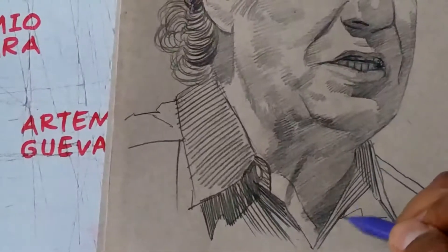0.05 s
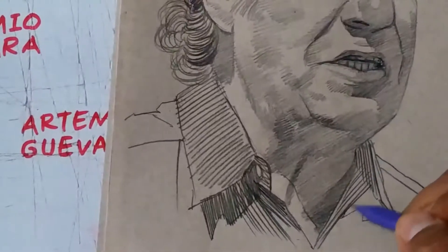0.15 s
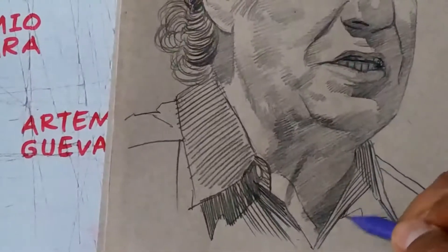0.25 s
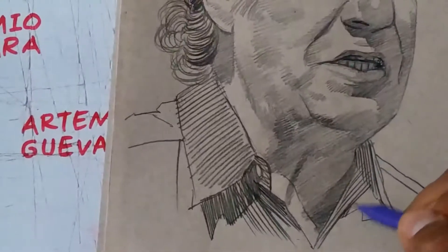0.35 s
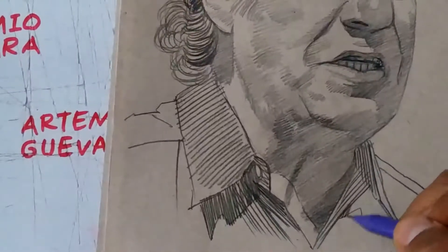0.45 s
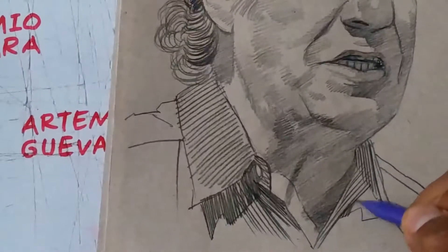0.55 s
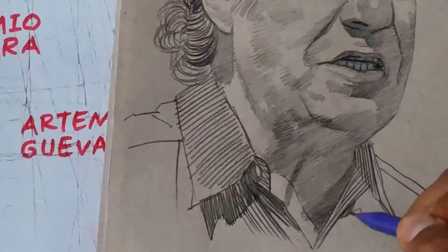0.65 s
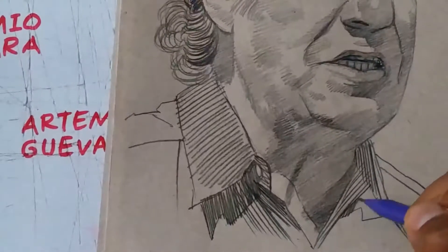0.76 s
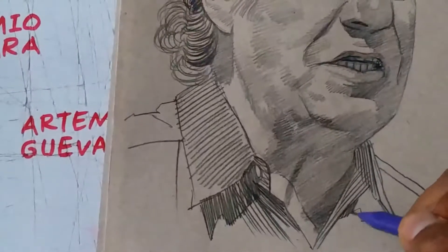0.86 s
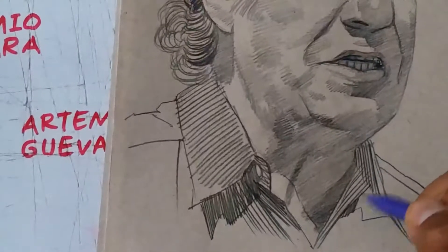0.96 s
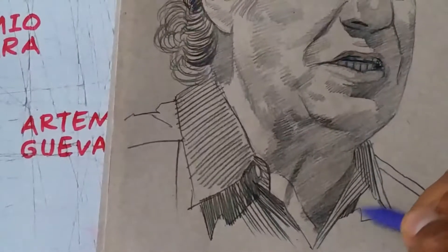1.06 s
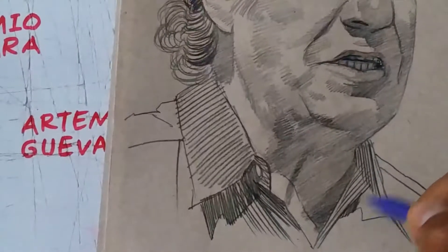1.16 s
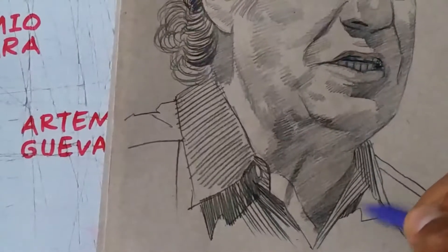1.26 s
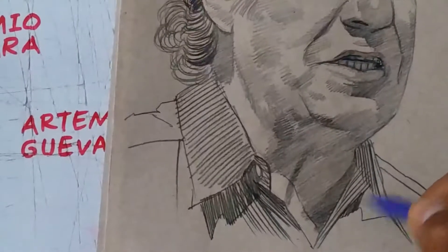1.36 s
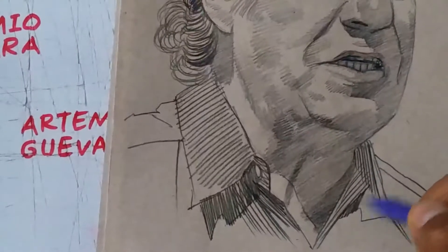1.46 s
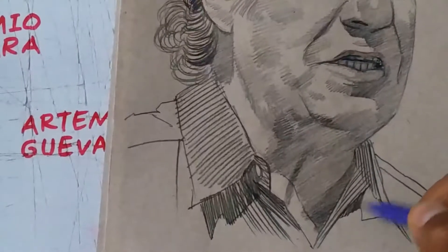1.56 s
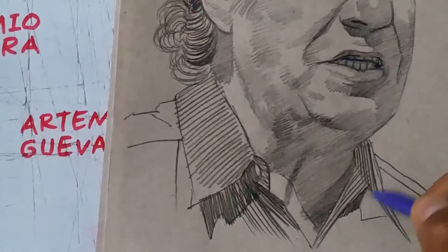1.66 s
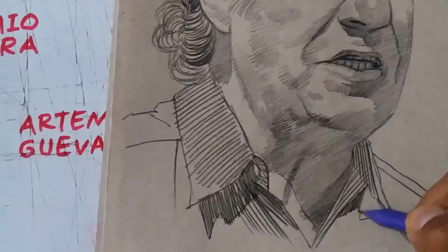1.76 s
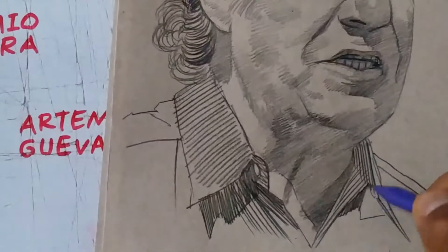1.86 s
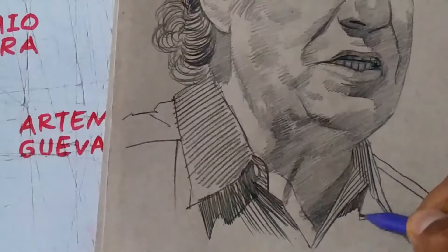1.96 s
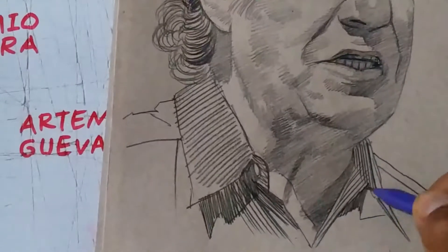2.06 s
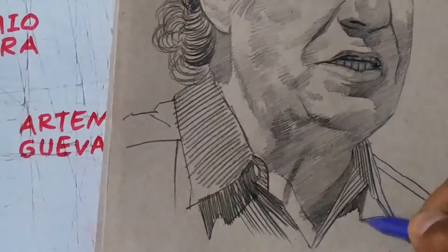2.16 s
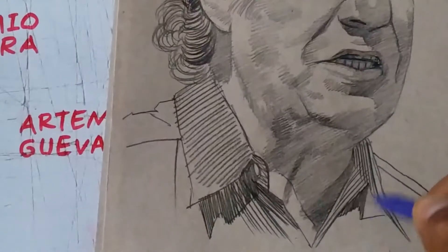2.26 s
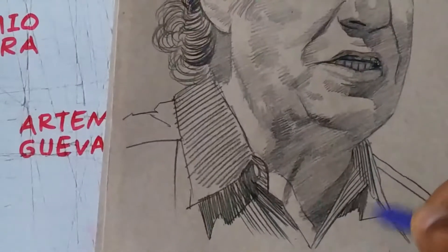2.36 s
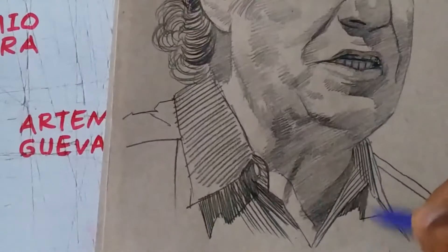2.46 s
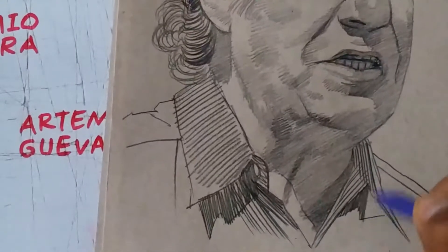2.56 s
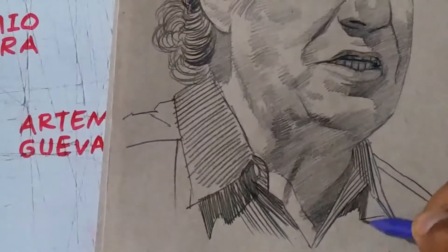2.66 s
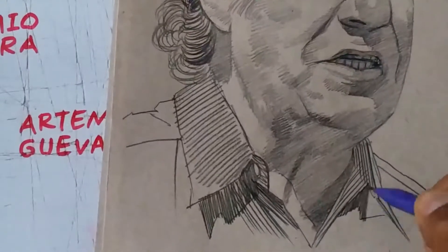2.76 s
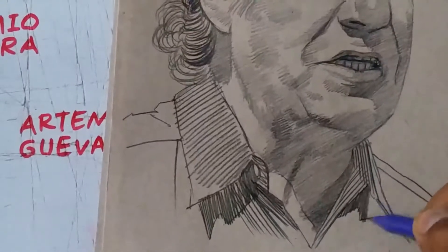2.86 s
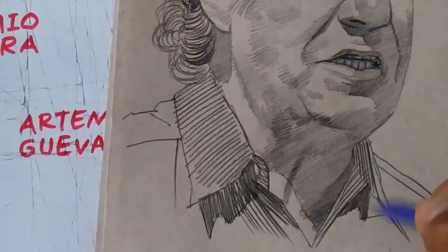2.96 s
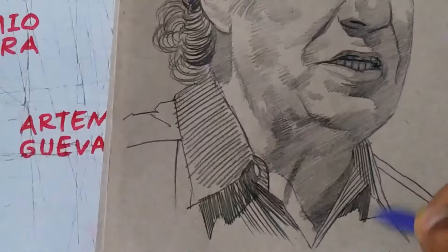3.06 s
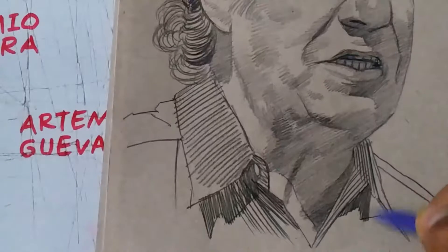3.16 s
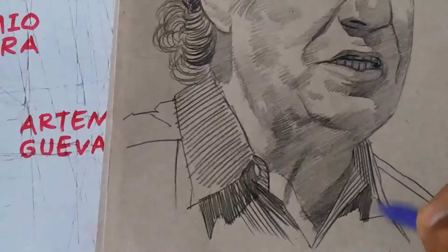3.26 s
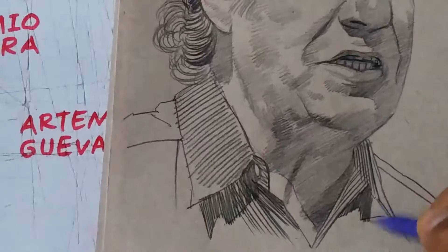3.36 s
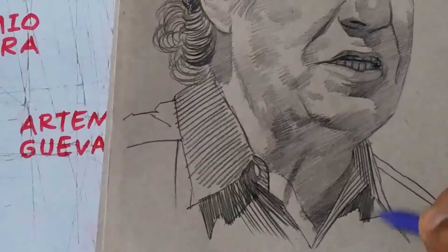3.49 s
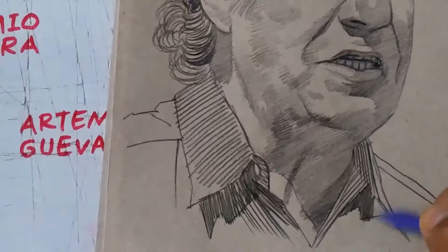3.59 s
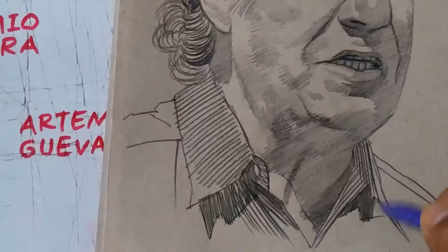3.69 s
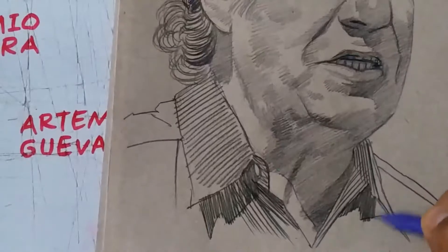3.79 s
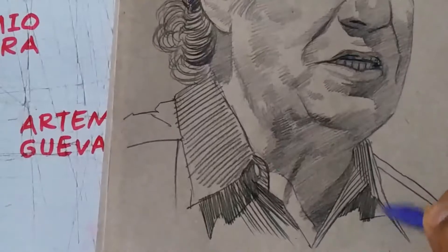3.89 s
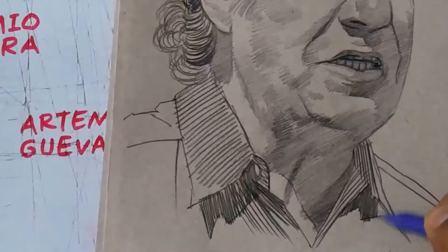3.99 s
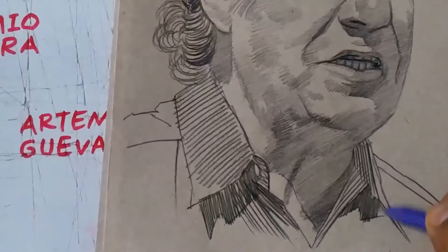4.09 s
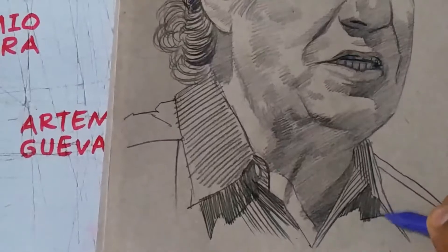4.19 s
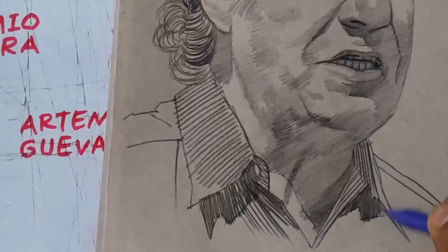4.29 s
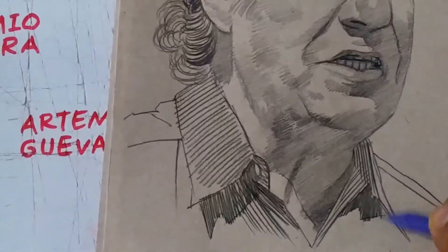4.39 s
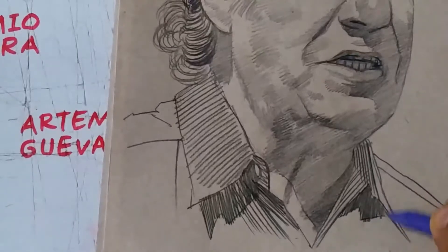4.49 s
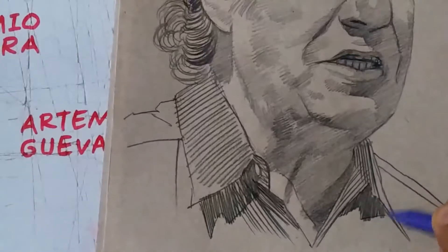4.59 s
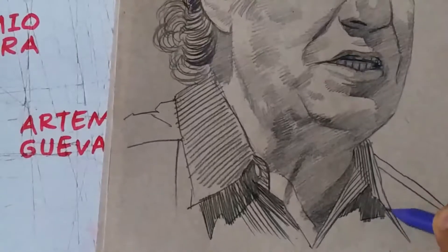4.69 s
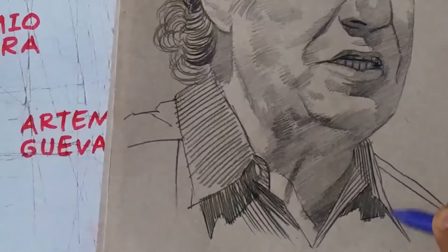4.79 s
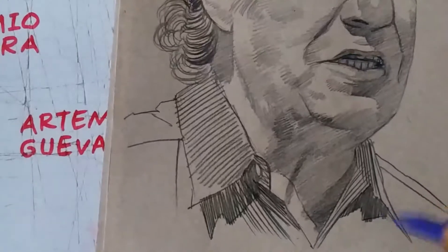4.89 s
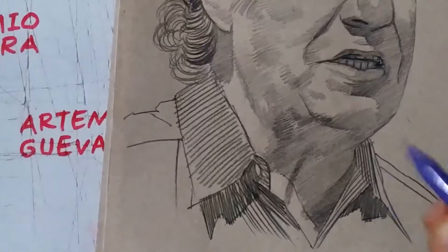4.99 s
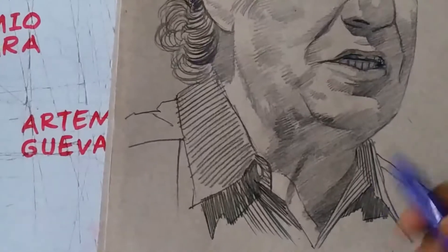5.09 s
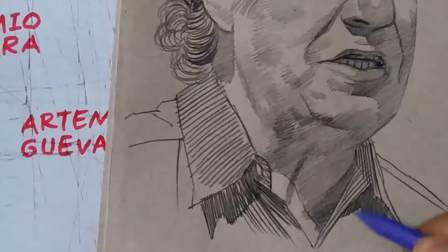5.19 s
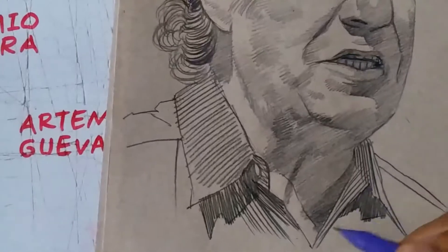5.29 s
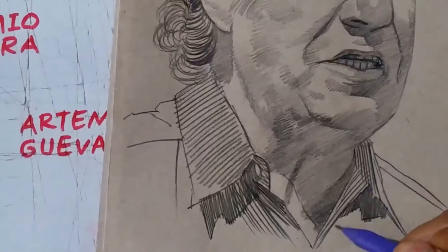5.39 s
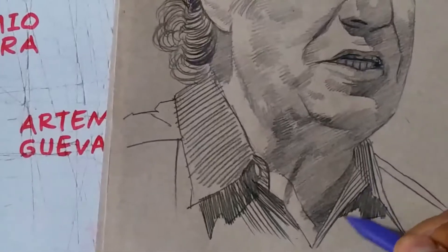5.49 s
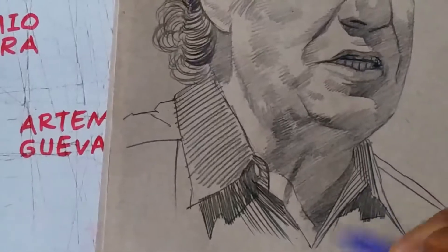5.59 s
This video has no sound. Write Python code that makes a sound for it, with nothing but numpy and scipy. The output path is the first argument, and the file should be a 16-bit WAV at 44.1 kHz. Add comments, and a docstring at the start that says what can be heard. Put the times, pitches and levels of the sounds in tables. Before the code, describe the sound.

Dry, grainy back-and-forth pencil strokes run steadily, papery at first and then a little woodier, with low thuds from the board beneath. They lighten and stop; the pencil slides squeakily through the fingers and clicks. Three separate, weightier scratches end it. Close microphone, small quiet room, short faint reverberation, low rumble and hiss.

```python
"""Pencil hatching on paper

A pencil hatches back and forth on a sheet of paper lying on a board, close to the microphone in a quiet room.
The paper's grain jolts the lead: random jolts excite resonances, so the pencil rings, the sheet rasps and
the board thuds. In a pause the pencil slides through the fingers (rubbing noise through the barrel's
resonances) and clicks (decaying sines); then three firmer strokes follow on another part of the sheet."""
import sys
import numpy as np
from scipy import signal
from scipy.fft import rfft, irfft
from scipy.io import wavfile
from scipy.ndimage import map_coordinates

SR = 44100
rng = np.random.default_rng(int(sys.argv[2]) if len(sys.argv) > 2 else 0)


def output_pcm(signal):
    """Save a mono or channel-first signal as 16-bit PCM at the path in sys.argv[1].

    Samples are clipped to [-1, 1] before scaling.
    """
    pcm = np.clip(np.atleast_2d(signal).T, -1, 1) * 32767
    wavfile.write(sys.argv[1], SR, np.round(pcm).astype(np.int16))


N = 248724
TAPS = 8192  # length of the frequency responses in samples
BINS = np.fft.rfftfreq(TAPS, 1 / SR)  # their frequencies in Hz


def gain_of(db):
    """The decibel: twenty times the logarithm of an amplitude ratio, inverted here."""
    return 10 ** (np.asarray(db) / 20)


def evened(x):
    """Root-mean-square level: scales a signal to rms 1."""
    return x / np.sqrt(np.mean(x ** 2) + 1e-20)


def unit(gain):
    """Power through a filter: scales a response to pass white noise at equal power."""
    return gain / np.sqrt(np.mean(gain ** 2))


def at(curve, s):
    """Linear interpolation: reads a curve at time s."""
    return np.interp(s, *np.transpose(curve))


def read(points, hz):
    """Logarithmic pitch scale: interpolates a table along log frequency."""
    f, value = np.transpose(points)
    return np.interp(np.log(hz + 1), np.log(f), value)


def add(mix, s, sound):
    """Superposition: adds a sound into the mix at time s."""
    part = mix[max(round(s * SR), 0):][:len(sound)]
    part += sound[:len(part)]


def humps(modes, shift=1):
    """Resonance: steep-sided peaks in gain, their powers summed."""
    power = 0
    for hz, width, db in modes:
        offset = (BINS - hz * shift) / (width / np.sqrt(2))
        power = power + (gain_of(db) / (1 + offset ** 2)) ** 2
    return np.sqrt(power)


def above(hz):
    """Band splitting: a soft step from 0 to 1 around a frequency."""
    return 1 / (1 + (hz / (BINS + 1)) ** 40)


def ring(gain):
    """Minimum phase: the causal impulse response whose gain over frequency is given."""
    log_gain = np.log(np.maximum(gain / gain.max(), 1e-5))
    circle = np.concatenate([log_gain, log_gain[-2:0:-1]])
    spectrum = np.exp(np.conj(signal.hilbert(circle)))[:len(BINS)]
    return gain.max() * irfft(spectrum)[:TAPS // 2]


def wander(count, hz):
    """Slow random modulation of rms 1: straight lines between hz random values a second."""
    knots = rng.standard_normal(4096)
    return evened(np.interp(np.arange(count) * hz / SR, np.arange(len(knots)), knots))


def fibres(speed, density, spread_db, clump_db, clump_hz):
    """Roughness excitation: random jolts, more of them at speed, uneven in size, in clumps."""
    count = len(speed)
    hit = rng.random(count) < density * (.3 + speed) / SR  # density * (0.3 + speed) jolts a second
    size = gain_of(spread_db * np.minimum(rng.exponential(1, count), 4))
    size = size * rng.choice([-1, 1], count)
    return hit * size * gain_of(clump_db * wander(count, clump_hz))


def driven(jolts, force, gain):
    """Forced vibration: jolts under a force curve ring a body; force and gain set the energy."""
    sound = signal.fftconvolve(jolts * force, ring(gain))
    energy = np.sum(force ** 2) * np.mean(gain ** 2)
    return sound * np.sqrt(energy / (np.sum(sound ** 2) + 1e-20))


def blows(rows, gain, contact_s):
    """Impact excitation: decaying noise bursts ring a body; each row gives start_s, peak_db."""
    out, t, body = np.zeros(N), np.arange(TAPS // 8) / SR, ring(gain)
    for s, db in rows:
        burst = rng.standard_normal(len(t)) * np.exp(-t / contact_s)
        sound = signal.fftconvolve(burst, body)
        add(out, s, gain_of(db) * sound / abs(sound).max())
    return out


def ripple(shortest_s, longest_s, strength, most=.6):
    """Random spectral ripple: two randomly drawn combs give each stroke its own uneven colour."""
    colour = 1
    for spacing_s in rng.uniform(shortest_s, longest_s, 2):  # the ripple repeats every 1 / spacing_s Hz
        turn = np.exp(2j * np.pi * (BINS * spacing_s + rng.random()))
        colour = colour * abs(1 + np.clip(strength, 0, most) * turn)
    return colour


def sliding(sound, count, glide):
    """Pitch glide by resampling: the resonances slide while the tip travels for count samples."""
    pace = 1 + glide * np.interp(np.arange(len(sound)), [0, count], [-1, 1])
    return map_coordinates(sound, [np.cumsum(pace)], order=5)


# spectrum of the room noise: pitch_hz [Hz], relative density_db [dB per Hz]
NOISE_SPECTRUM = [(20, -39), (55, 9), (120, -6.5), (250, -13.5), (500, -24), (1000, -25.5), (3000, -30.5),
                  (6000, -30), (15500, -37)]
NOISE_DB = -45  # rms level before the rumble sways


def floor(sway_db=2):
    """Coloured noise: low room rumble that sways, under a steady faint hiss."""
    hz = np.fft.rfftfreq(N, 1 / SR)
    spectrum = rfft(rng.standard_normal(N)) * gain_of(read(NOISE_SPECTRUM, hz))
    noise = evened(irfft(spectrum, N))
    rumble = signal.sosfilt(signal.butter(2, 200, fs=SR, output="sos"), noise)
    sway = gain_of(sway_db * wander(N, 13)) - 1
    return gain_of(NOISE_DB) * (noise + rumble * sway)


# reverberation of the room: pitch_hz [Hz], t60_s [s]
ROOM_DECAY = [(100, 0.3), (400, 0.33), (1500, 0.32), (5000, 0.34), (13000, 0.26)]


def room(x, gap_s=0.0046):
    """Reverberation: dense reflections, each band dying at its own speed."""
    count = SR // 2
    late = np.arange(count) > gap_s * SR
    taps = rng.standard_normal(count) * (rng.random(count) < 4000 / SR) * late
    hz, t, z = signal.stft(taps, SR, nperseg=256)
    decay = gain_of(-60 * t / read(ROOM_DECAY, hz)[:, None])
    tail = signal.istft(z * decay, SR, nperseg=256)[1]
    return signal.fftconvolve(x, tail / np.linalg.norm(tail))[:N]


# the pencil clicks in the hand: start_s [s], peak_db [dB]
PENCIL_CLICKS = [(4.781, -9)]
# what a click rings with: pitch_hz [Hz], relative level_db [dB], t60_s [s]
CLICK_PARTIALS = [(2160, -29.5, 0.064), (4580, 1.5, 0.008), (5400, 0.5, 0.0096), (6750, -4, 0.016),
                  (11600, -22.5, 0.018)]


def clicks(contact_s=0.00064):
    """Free vibration: hard plastic parts knock together and their modes decay exponentially."""
    out, t, click = np.zeros(N), np.arange(TAPS // 4) / SR, 0
    for hz, db, t60 in CLICK_PARTIALS:
        click = click + gain_of(db - 60 * t / t60) * np.sin(2 * np.pi * hz * t)
    click = click * (1 - np.exp(-(t / contact_s) ** 2))  # the contact softens the onset
    for s, db in PENCIL_CLICKS:
        add(out, s, gain_of(db) * click / abs(click).max())
    return out


# fingers slide along the barrel: start_s [s], length_s [s], rise_s [s], hold_s [s], level_db [dB],
# low_db and high_db, the low and high resonances relative to the middle [dB]
FINGER_RUBS = [(4.462, .32, 0.05, 0.13, -33, -6, -20), (4.776, 0.14, 0.0072, .01, -40, -21, -15)]
# resonances of the rubbed barrel: pitch_hz [Hz], width_hz [Hz], relative level_db [dB]
BARREL_RESONANCES = [(1120, 120, -12.5), (1707, 82, -1), (2410, 130, -1.5), (3620, 710, 0),
                     (4500, 810, -1.5), (4850, 500, 2), (5480, 450, 0), (5570, 220, 0.5), (6780, 440, -6),
                     (7550, 350, -12), (8950, 410, -13)]
RUB_FADE_DB_PER_S, RUB_RELEASE_S = 105, 0.025
LOW_POWER = 4.2  # low resonances follow force to this power, so they come late and leave early


def slide():
    """Friction: skin rubs along the barrel; each rub swells, holds and fades, lows needing most force."""
    out, barrel = np.zeros(N), humps(BARREL_RESONANCES)
    not_low, high = above(3680), above(6200)
    for s, length, rise, hold, db, low_db, high_db in FINGER_RUBS:
        t = np.arange(0, length, 1 / SR)
        easing = np.maximum(t - rise - hold, 0)
        force = np.minimum(t / rise, 1) * gain_of(-RUB_FADE_DB_PER_S * easing)
        force = force * np.minimum((length - t) / RUB_RELEASE_S, 1)
        jolts = fibres(np.ones(len(t)), density=8700, spread_db=-0.5, clump_db=1.7, clump_hz=252.5)
        parts = [(not_low * (1 - high), force),
                 (1 - not_low, gain_of(low_db) * force ** LOW_POWER),
                 (high, gain_of(high_db) * force)]
        for band, level in parts:
            rub = signal.fftconvolve(jolts, ring(barrel * band))[:len(t)]
            add(out, s, gain_of(db) * level * evened(rub))
    return out


# the skin catches on the barrel: start_s [s], peak_db [dB]
SKIN_CATCHES = [(4.5195, -21), (4.5735, -19), (4.6035, -20), (4.7748, -19.5)]


def catches():
    """Impact: the skin catches on the barrel and sets it ringing."""
    return blows(SKIN_CATCHES, humps(BARREL_RESONANCES), contact_s=0.0017)


# the heel of the hand shifts: start_s [s], length_s [s], desk rumble_db [dB], board rustle_db [dB]
HAND_SHIFTS = [(4.954, 0.057, -45, -66), (5.022, 0.093, -70, -46.5), (5.357, 0.1, -30, -41.5),
               (5.589, 0.049, -28, -43)]


def hand():
    """Sliding contact: the heel of the hand lands and drags a little, a soft, dull rustle."""
    out, desk, wood = np.zeros(N), unit(humps(DESK_RESONANCES)), unit(humps(BOARD_RESONANCES[1]))
    for s, length, desk_db, board_db in HAND_SHIFTS:
        u = np.linspace(0, 1, round(length * SR))
        force = np.interp(u, [0, .06, .7, 1], [0.17, 1.3, 1.1, 0.57])
        jolts = fibres(force, density=4000, spread_db=1.5, clump_db=2.5, clump_hz=120)
        add(out, s, driven(jolts, force, gain_of(desk_db) * desk + gain_of(board_db) * wood))
    return out


# the hand or the tip bumps the board: start_s [s], peak_db [dB], board_db relative to the desk [dB]
BOARD_BUMPS = [(0.234, -20.5, -18), (0.564, -13.5, -14.5), (0.856, -25, -21), (0.967, -19.5, -2),
               (1.423, -20.5, -16), (1.549, -20, -11), (1.637, -31, -24), (1.853, -15.5, 3),
               (1.977, -30, -20), (2.092, -20, 10), (2.232, -22, -25), (2.894, -18.5, -23), (2.988, -19, 9),
               (5.207, -17, 10), (5.442, -10, 1)]


def bumps(soft_hz=430, contact_s=0.001):
    """Soft impact: a knock rings the desk and the board's lower resonances."""
    desk = humps(DESK_RESONANCES)
    wood = humps(BOARD_RESONANCES[1]) / (1 + (BINS / soft_hz) ** 4)
    return sum(blows([(s, db)], desk + gain_of(board_db) * wood, contact_s)
               for s, db, board_db in BOARD_BUMPS)


# the lead snags on the paper: start_s [s], peak_db [dB], crackle_db of the sheet relative to the tip [dB]
PAPER_SNAGS = [(0.208, -29, -14), (0.406, -17.5, 15), (0.623, -21, -14), (0.838, -17, -20),
               (1.045, -24, -12), (1.485, -34, -21), (1.929, -22, -20), (2.165, -15.5, 4),
               (2.288, -22.5, -20), (2.752, -29, 4), (2.856, -35, -14), (3.299, -15, -26),
               (3.3059, -14, -9), (3.3225, -18, 1), (5.358, -31, -21)]
TEAR_DB = -19  # a broad tick of tearing fibres within the crackle


def snags():
    """Impact: a snag rings the tip and makes the sheet crackle, with a faint tick of tearing fibres."""
    tip = humps(TIP_RESONANCES[0])
    crackle = humps(SHEET_RESONANCES[0]) + gain_of(TEAR_DB) * above(810) * (1 - above(4900))
    return sum(blows([(s, db)], tip + gain_of(crackle_db) * crackle, contact_s=.0026)
               for s, db, crackle_db in PAPER_SNAGS)


# the desk's low resonances: pitch_hz [Hz], width_hz [Hz], relative level_db [dB]
DESK_RESONANCES = [(63, 20, -1.5), (97, 34, -2.5), (119, 25, 2.5)]


def thud(jolts, speed):
    """Structure-borne sound: the stroke's jolts reach the desk and excite its low resonances."""
    return driven(jolts, speed ** 0.52, unit(humps(DESK_RESONANCES)))


# resonances of the board, one list a spot: pitch_hz [Hz], width_hz [Hz], relative level_db [dB]
BOARD_RESONANCES = [
    [(197, 29, 5), (242, 37, -0.5), (303, 68, -2), (375, 92, 0.5), (480, 92, 2.5), (557, 90, -5.5),
     (640, 21, -3.5), (733, 32, -7), (822, 32, -13.5)],
    [(198, 39, 5), (240, 43, 0), (308, 91, -3), (368, 72, 3), (480, 130, -6), (635, 91, -6.5),
     (744, 46, -8)],
]


def board(speed, spot, pitch_hz, upper_db, focus_db=4, bite_db=5):
    """Judder on a plate: higher resonances sound as the pencil bites, low ones only at speed."""
    judder = fibres(speed, density=1800, spread_db=2.0, clump_db=2.5, clump_hz=117.0)
    octaves_away = abs(np.log2((BINS + 1) / pitch_hz))
    focus = gain_of(-focus_db * octaves_away + upper_db * above(540))
    colour = ripple(0.0023, 0.00694, strength=0.33)
    gain = unit(humps(BOARD_RESONANCES[spot]) * focus * colour)
    high, bite = above(418.6), gain_of(bite_db * np.linspace(.4, -.6, len(speed)))
    return driven(judder, speed * bite, gain * high) + driven(judder, speed ** 1.5, gain * (1 - high))


# bending resonances of the sheet, one list a spot: pitch_hz [Hz], width_hz [Hz], relative level_db [dB]
SHEET_RESONANCES = [
    [(1066, 64, 2), (1157, 97, 1.5), (1286, 67, 2.5), (1387, 120, -4.5), (1500, 73, -12), (1660, 42, -5.5),
     (1830, 62, -52)],
    [(1110, 88, 5), (1247, 88, 3), (1396, 86, 2), (1550, 76, -4), (1654, 45, 1)],
]


def sheet(speed, spot, direction):
    """Bending waves: coarser bumps of the paper shake the sheet."""
    coarse = fibres(speed, density=3000, spread_db=0.5, clump_db=3.0, clump_hz=157)
    colour = ripple(0.002023, 0.00691, strength=0.38)
    sound = driven(coarse, speed ** 1.09, unit(humps(SHEET_RESONANCES[spot]) * colour))
    return sliding(sound, len(speed), glide=0.0522 * direction)


# resonances of the scratching tip, one list a spot: pitch_hz [Hz], width_hz [Hz], relative level_db [dB]
TIP_RESONANCES = [
    [(1880, 270, -21), (2400, 90, -18), (2800, 70, -23), (3070, 420, -24), (3693, 110, -12),
     (4257, 280, -2.5), (4490, 306, 1), (5214, 324, 4), (5630, 81, -8), (5880, 210, -4.5),
     (6480, 274, -1.5), (6970, 206, -1), (7728, 194, -1.5), (8080, 220, -8.5), (9010, 260, -12.5),
     (10320, 660, -20.5), (10750, 510, -20.5), (11680, 300, -16), (12820, 300, -14)],
    [(2140, 130, -14), (2510, 310, -4), (2950, 550, -1.5), (3520, 190, -5), (4370, 500, 4.5),
     (5290, 610, 1.5), (6480, 500, 2), (7200, 670, -1), (8300, 400, -9), (9240, 320, -1.5), (9900, 380, -4),
     (10800, 250, -22), (12340, 270, -10), (13100, 240, -8)],
]


def tip_gain(spot, direction, sheen_db, rasp_db, upper_db, detune=0.0089, uneven_db=2.03):
    """Boundary conditions: the grip alters the tip's modes a little with each stroke and its direction."""
    modes = [(hz * (1 + detune * rng.standard_normal()), width, db + uneven_db * rng.standard_normal())
             for hz, width, db in TIP_RESONANCES[spot]]
    gain = humps(modes, 1 - 0.0023 * direction) * ripple(0.001022, .004, strength=0.32)
    gain = gain * (1 - above(13940)) ** 2
    not_low, top = above(3800), above(8790)
    middle = gain * not_low * (1 - top)
    sheen = gain * top * ripple(0.000702, .0022, strength=0.72)
    rasp = gain * (1 - not_low) * gain_of(upper_db * above(2560))
    rasp = rasp * ripple(0.000489, 0.001929, strength=0.86)
    return unit(middle), gain_of(sheen_db) * unit(sheen), gain_of(rasp_db) * unit(rasp)


def scratch(jolts, speed, direction, bands, rock_db=0.79):
    """Varying contact: the lead rocks on its facet, so each band of resonances swells on its own."""
    count, tip = len(speed), 0
    for band in bands:
        force = speed ** 0.87 * gain_of(rock_db * wander(count, 82.4))
        tip = tip + driven(jolts, force, band)
    return sliding(tip, count, glide=0.0061 * direction)


def stroke_speed(length, crest):
    """Kinematics: the tip speeds up from rest to its top speed and slows to rest again."""
    u = np.linspace(0, 1, round(length * SR))
    return np.sin(np.pi / 2 * np.interp(u, [0, np.clip(crest, .02, .95), 1], [0, 1, 0]))


# one row a stroke: start_s [s], length_s [s], crest, the place of top speed [0-1],
# scratch level_db [dB], weight_db of the hand [dB]
PENCIL_STROKES = [(.007, 0.085, 0.43, -30, -7), (.101, .082, 0.48, -29, -2.5),
                  (.196, 0.088, 0.42, -29.5, -0.5), (.296, 0.079, 0.55, -28.5, -1.5),
                  (.392, 0.096, 0.15, -29.5, -3.5), (.52, 0.087, 0.28, -30, -3.5),
                  (.604, 0.098, 0.57, -27, -9), (.722, 0.081, 0.52, -28.5, -8),
                  (.82, 0.09, 0.51, -25.5, -7), (.925, 0.08, 0.63, -28, -4.5), (1.036, 0.1, 0.1, -29, -7.5),
                  (1.142, 0.11, 0.29, -34, -8), (1.257, .11, 0.24, -31, -9.5),
                  (1.373, 0.096, 0.4, -33.5, 0.5), (1.47, 0.11, .21, -30.5, -2),
                  (1.577, 0.1, 0.29, -31.5, -1.5), (1.68, 0.11, .47, -29.5, -6),
                  (1.799, .11, .44, -29.5, -3), (1.92, .12, 0.26, -29.5, -7.5),
                  (2.041, 0.098, 0.42, -31, 0.5), (2.155, .13, 0.1, -30, -3.5), (2.279, 0.11, 0.21, -32, 1),
                  (2.384, 0.11, 0.24, -28.5, -4), (2.526, 0.087, 0.63, -33, -.5),
                  (2.633, .11, 0.09, -32, -1.5), (2.74, 0.088, 0.52, -29.5, -2),
                  (2.85, .11, 0.06, -30.5, -9.5), (2.954, 0.088, 0.55, -30, -2),
                  (3.06, 0.099, 0.07, -29.5, -7), (3.184, 0.074, .58, -29, -5.5),
                  (3.281, 0.082, 0.23, -27.5, -6), (3.392, 0.068, 0.58, -30, -3.5),
                  (3.478, 0.11, 0.18, -31.5, -9.5), (3.598, 0.06, 0.45, -29.5, -4),
                  (3.685, 0.085, 0.07, -32, -20), (3.801, 0.066, .05, -35, -7),
                  (3.884, 0.093, 0.4, -36.5, -12.5), (3.99, 0.062, 0.57, -29.5, -12),
                  (4.071, 0.09, 0.13, -34, -11.5), (4.171, 0.072, 0.62, -36, -17.5),
                  (4.386, 0.099, 0.09, -41, -8), (5.167, 0.079, 0.53, -28, 6.5),
                  (5.397, .089, 0.52, -29.5, 7), (5.605, 0.072, 0.52, -33, 3)]
MOVE_S = 5  # strokes after this time are on the second spot of the sheet
# how loosely the sheet lies under the tip: start_s [s], slack [0 flat, about 1 lifted]
SHEET_SLACK = [(0, 0.49), (.1, 0.87), (.2, 0.66), (.3, 1.18), (.53, 0.8), (.63, 0.85), (1.04, .8),
               (1.15, 0.34), (1.57, 0.22), (1.8, 0), (2.04, 0.01), (2.155, 0.46), (2.28, 0.29),
               (2.7, 0.045), (2.95, 0.036), (3.2, 0.054), (3.4, 0.53), (4.07, 0.51), (4.4, 0.55),
               (5.2, 0.24)]
# levels of the tip's top and low bands, the sheet and the board against the scratch: first spot [dB],
# second spot [dB], follow, per dB of the hand's weight [dB/dB], lift, added per unit of slack [dB]
SHEEN_LEVEL = (-7.5, -9.5, 0.43, -4.5)
RASP_LEVEL = (-20, -15.5, 0.84, 12)
SHEET_LEVEL = (-6.5, -9.5, 1.1, 5)
BOARD_LEVEL = (3.5, 5.5, 1.0, -5.5)
PUSH_SHEEN_DB = 1.54  # a push is this much brighter, a pull this much duller
# a layer's upper resonances against its lower ones [dB], and the change per unit of slack [dB]
RASP_UPPER_DB, RASP_UPPER_LIFT_DB = -2.5, 8
BOARD_UPPER_DB, BOARD_UPPER_LIFT_DB = 2.2, -8
# level of the desk's thud against the scratch, before the hand's weight: start_s [s], level_db [dB]
THUD_LEVEL = [(0, -6), (.39, -17), (.55, 3), (1.2, -5.5), (1.42, 7.5), (1.68, 8), (1.85, -8), (2.2, -1),
              (2.5, -9), (2.7, 0.5), (3.1, 1), (3.3, -10), (3.9, 3), (4.2, -9), (5.17, -9.5), (5.45, -2)]
THUD_PER_WEIGHT = 0.86  # dB per dB of the hand's weight
# the board's strongest pitch under the travelling tip, before it strays: start_s [s], pitch_hz [Hz]
BOARD_FOCUS = [(.35, 420), (.55, 206), (.93, 232), (1.1, 530), (1.35, 392), (1.75, 245), (2.2, 424),
               (2.85, 425), (2.96, 228), (3.2, 490), (4.4, 520), (5.17, 288)]
STRAY_OCTAVES = 0.1  # standard deviation from stroke to stroke


def layer_db(levels, spot, weight_db, slack):
    """Coupling: a layer's level follows the spot, the hand's weight and the sheet's slack."""
    *base, follow, lift = levels
    return base[spot] + follow * weight_db + lift * slack


def strokes():
    """Roughness-driven vibration: the grain drives tip, sheet, board and desk under hand and slack."""
    out = np.zeros(N)
    for index, (s, length, crest, db, weight_db) in enumerate(PENCIL_STROKES):
        spot, slack, speed = int(s > MOVE_S), at(SHEET_SLACK, s), stroke_speed(length, crest)
        # +1 push, -1 pull: in turn at the first spot, only pushes at the second
        direction = 1 if spot or index % 2 else -1
        sheen_db = layer_db(SHEEN_LEVEL, spot, weight_db, slack) + PUSH_SHEEN_DB * direction
        rasp_db = layer_db(RASP_LEVEL, spot, weight_db, slack)
        sheet_db = layer_db(SHEET_LEVEL, spot, weight_db, slack)
        board_db = layer_db(BOARD_LEVEL, spot, weight_db, slack)
        thud_db = at(THUD_LEVEL, s) + THUD_PER_WEIGHT * weight_db
        rasp_upper_db = RASP_UPPER_DB + RASP_UPPER_LIFT_DB * slack
        board_upper_db = BOARD_UPPER_DB + BOARD_UPPER_LIFT_DB * slack
        board_hz = at(BOARD_FOCUS, s) * 2 ** (STRAY_OCTAVES * rng.standard_normal())
        fine = fibres(speed, density=9000, spread_db=3.0, clump_db=0.8, clump_hz=447.0)
        bands = tip_gain(spot, direction, sheen_db, rasp_db, rasp_upper_db)
        add(out, s, gain_of(db) * scratch(fine, speed, direction, bands))
        add(out, s, gain_of(db + sheet_db) * sheet(speed, spot, direction))
        add(out, s, gain_of(db + board_db) * board(speed, spot, board_hz, board_upper_db, focus_db=5.0))
        add(out, s, gain_of(db + thud_db) * thud(fine, speed))
    return out


def scene(room_db=-9.5):
    """Superposition: direct sound of pencil, hand and board, its reverberation and the room noise."""
    near = strokes() + snags() + bumps() + hand() + slide() + catches() + clicks()
    return (near + gain_of(room_db) * room(near) + floor())[None]


def record(dry, low_cut_hz=40, edge_hz=15800):
    """Band limiting: the microphone's bass roll-off and the recorder's upper limit."""
    bass_cut = signal.butter(3, low_cut_hz, "high", fs=SR, output="sos")
    thinned = signal.sosfilt(bass_cut, dry)
    treble_cut = signal.firwin(2047, edge_hz, window=("kaiser", 9), fs=SR)
    return signal.oaconvolve(thinned, treble_cut[None], "same")


dry = scene()
out = record(dry)
output_pcm(out)
```